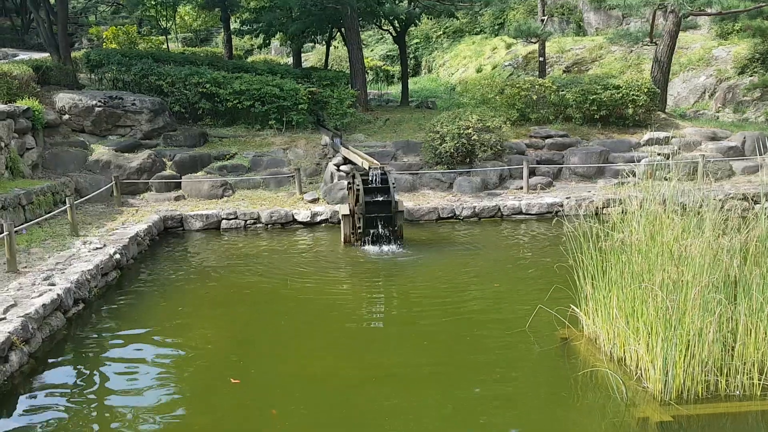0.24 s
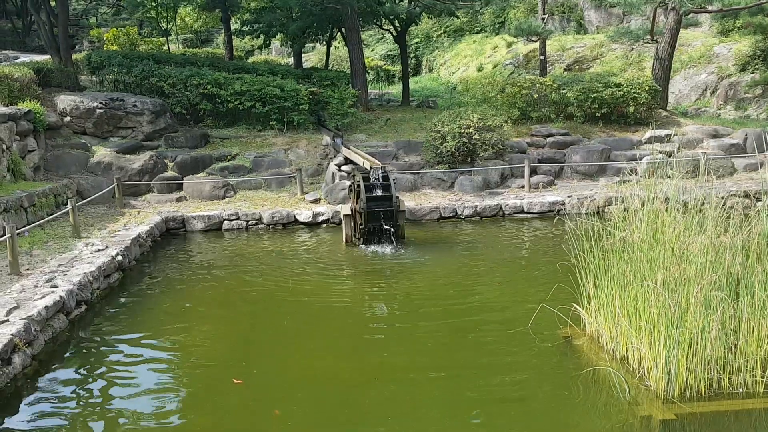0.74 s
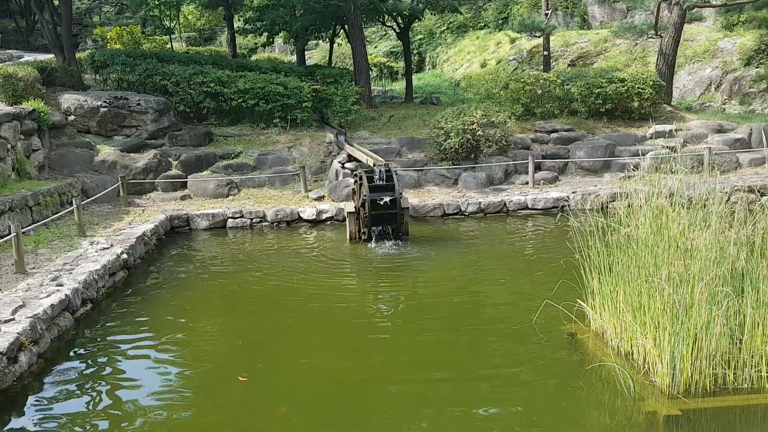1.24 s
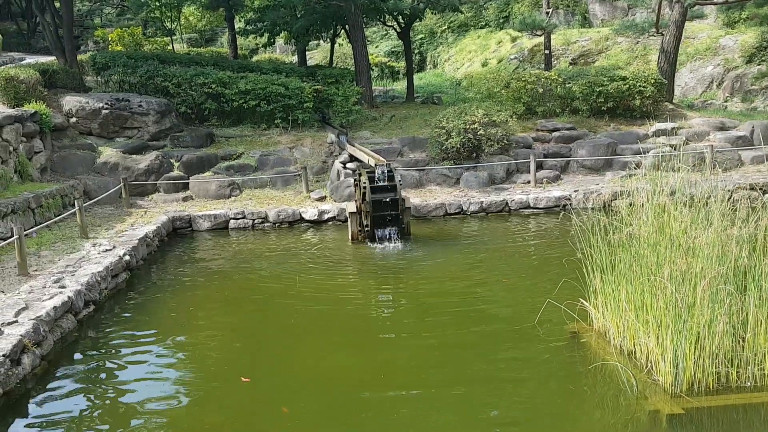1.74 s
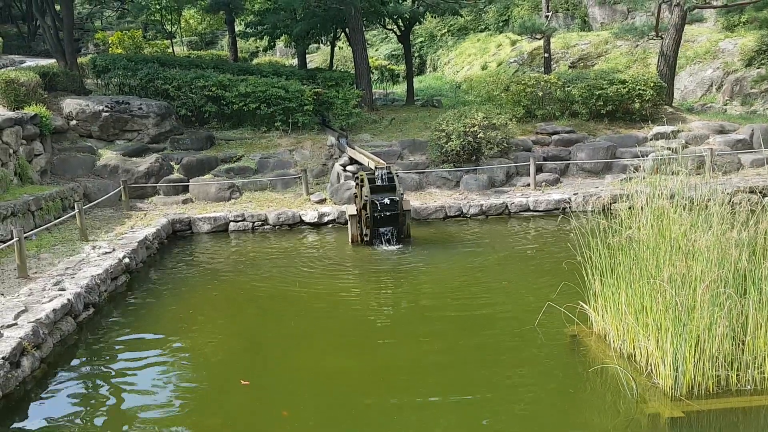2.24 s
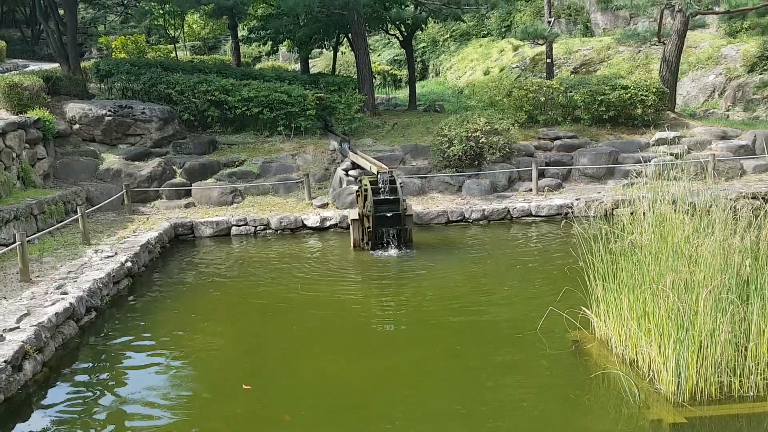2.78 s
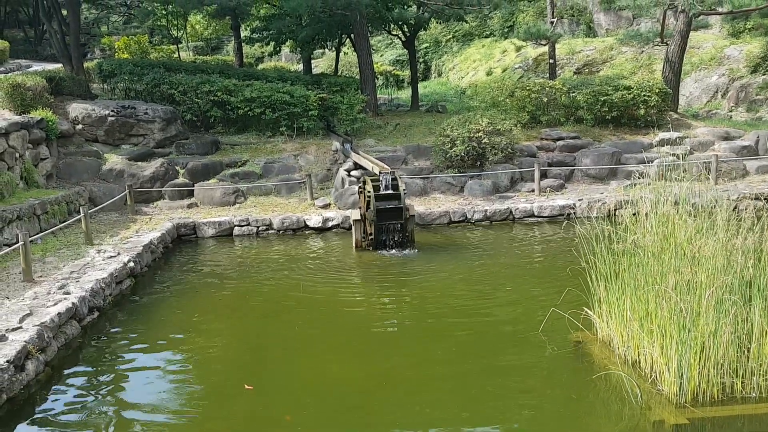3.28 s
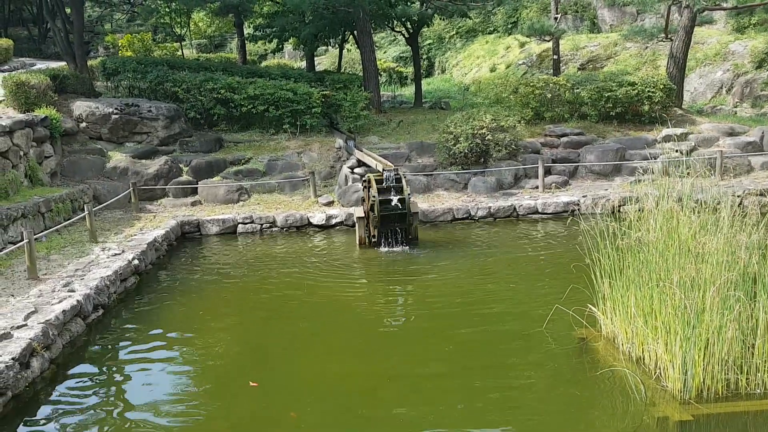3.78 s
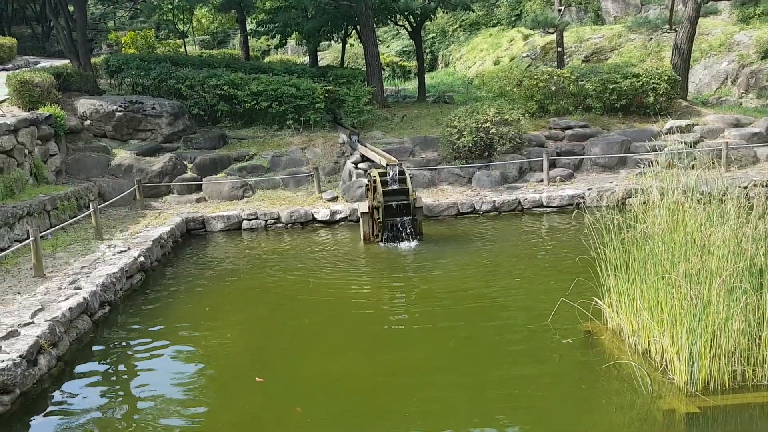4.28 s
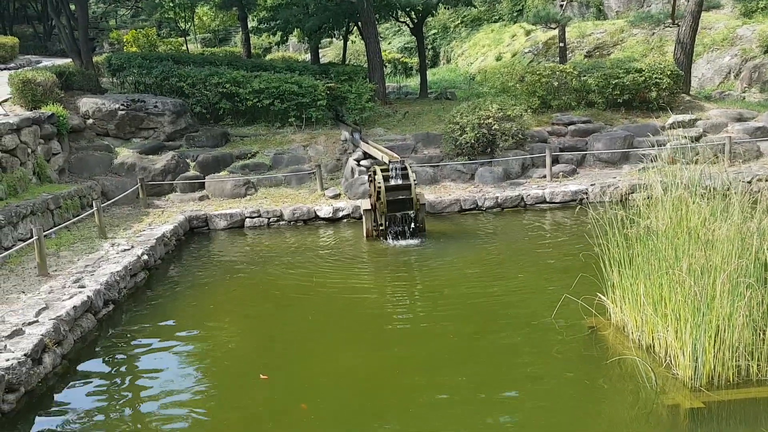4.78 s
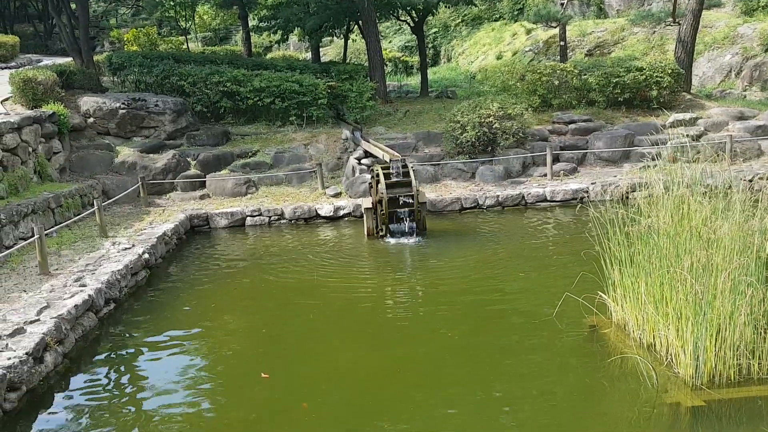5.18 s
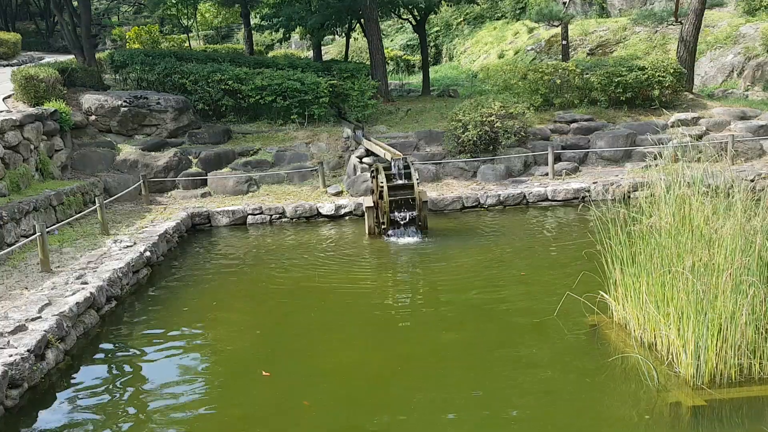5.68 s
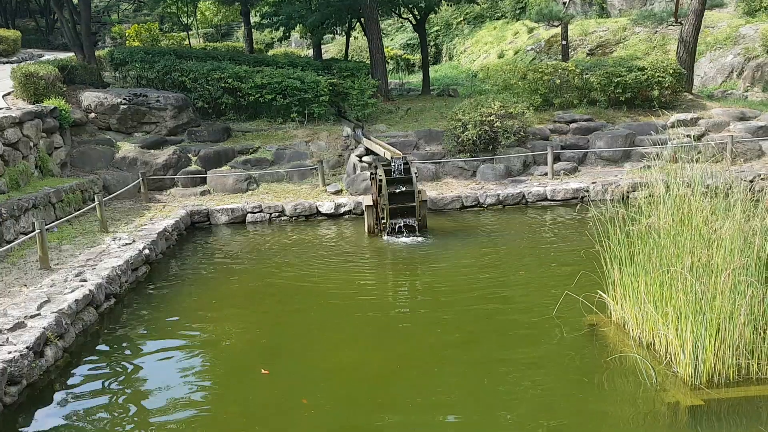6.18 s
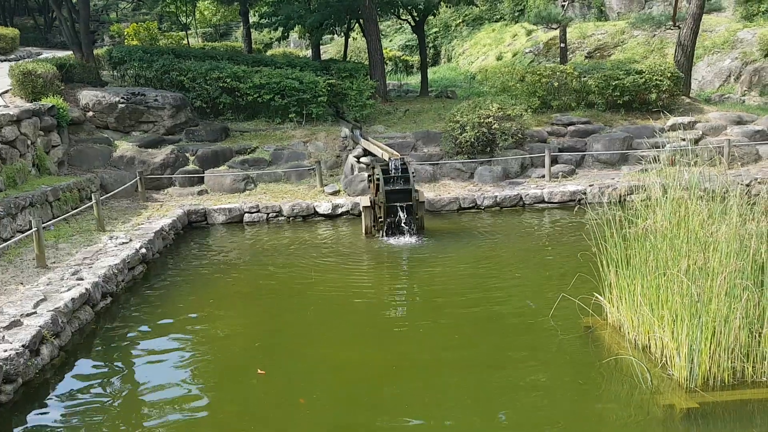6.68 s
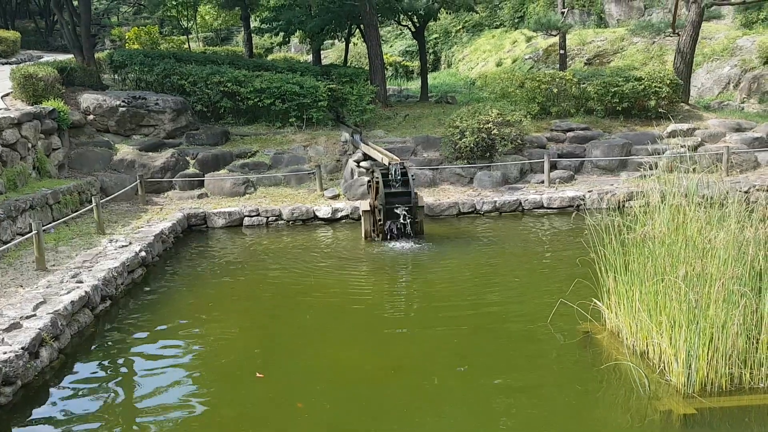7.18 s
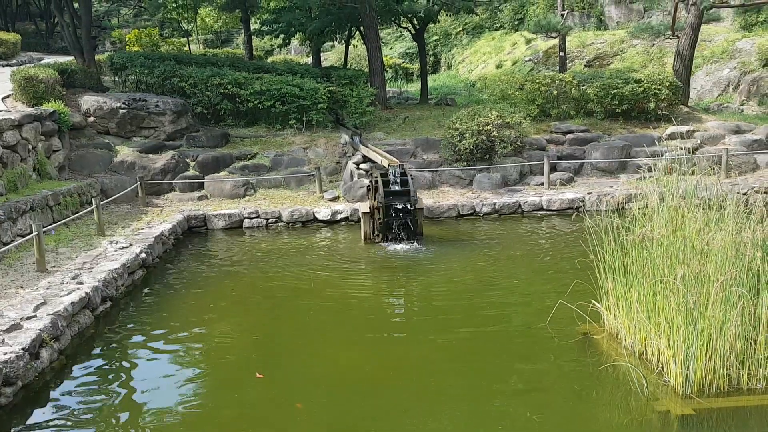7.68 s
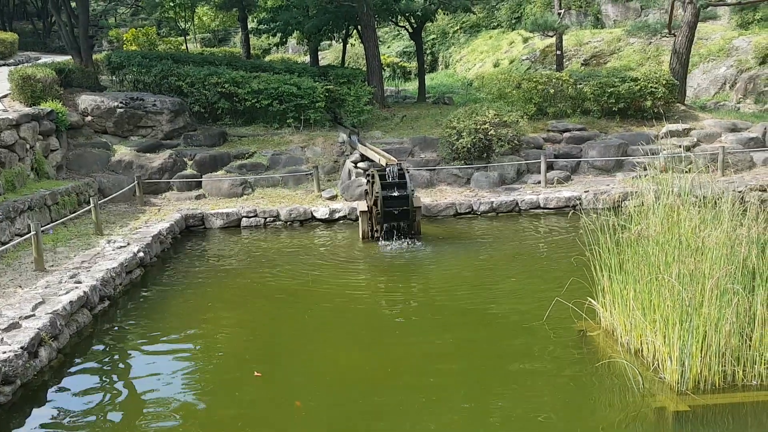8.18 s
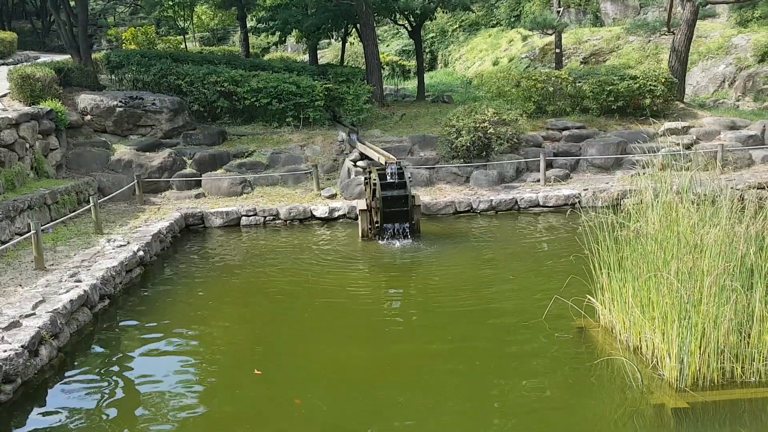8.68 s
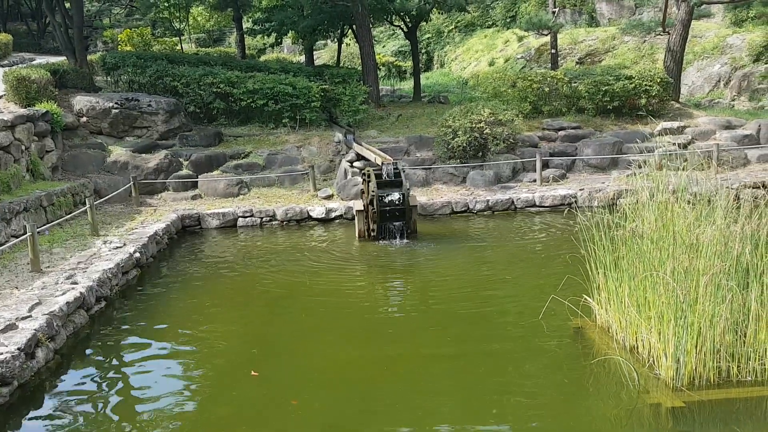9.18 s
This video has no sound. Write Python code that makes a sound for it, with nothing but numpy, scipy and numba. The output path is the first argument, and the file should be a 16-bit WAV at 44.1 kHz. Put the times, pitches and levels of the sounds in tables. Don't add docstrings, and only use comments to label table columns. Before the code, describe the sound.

A garden pond waterwheel thuds softly and pours splashing water as a rasping cicada chorus climbs to full strength and holds.

```python
import sys
import numpy as np
from scipy import signal
from scipy.fft import rfft, irfft, next_fast_len
from scipy.io import wavfile
from scipy.ndimage import uniform_filter1d
from numba import njit

SR = 44100
rng = np.random.default_rng(int(sys.argv[2]) if len(sys.argv) > 2 else 0)


def voltage_ratio(decibels):
    exponent = np.asarray(decibels, float) / 20
    return 10 ** exponent


def unload_wav(signal):
    wavfile.write(
        sys.argv[1],
        SR,
        np.round(np.clip(np.atleast_2d(signal).T, -1, 1) * 32767).astype(np.int16),
    )


N = 416304
TIME = np.arange(N) / SR
SIZE = next_fast_len(N)
HZ = np.arange(SIZE // 2 + 1) * SR / SIZE


def level(x, db):
    return x * voltage_ratio(db) / np.sqrt(np.mean(x ** 2))


def curve(table, axis=1):
    table = np.array(table, float)
    return np.interp(TIME, table[:, 0], table[:, axis])


def over_hz(table, axis=1):
    table = np.array(table, float)
    return np.interp(np.log(HZ + 1), np.log(table[:, 0]), table[:, axis])


def shape(x, gain):
    return irfft(rfft(x, SIZE) * gain, SIZE)[..., :N]


def walk(rate):
    hold = int(SR / rate)
    steps = np.repeat(rng.standard_normal(N // hold + 1), hold)
    return 1.3 * uniform_filter1d(uniform_filter1d(steps, hold), hold)[:N]


def low_pass(hz, order):
    return 1 / (1 + (HZ / hz) ** order)


def resonance(hz, width):
    return 1 / (1 + ((HZ - hz) / width) ** 2)


@njit
def grains(start, hz, ring, size, glide, rise, n):
    out = np.zeros(n)
    for k in range(len(start)):
        length, first, turn = int(ring[k] * SR), int(start[k] * SR), 0.
        for i in range(max(0, -first), min(length, n - first)):
            turn += 2 * np.pi * hz[k] * (1 + glide * i / length) / SR
            fade = 1000. ** (-i / length)
            push = 1 - np.exp(-i / (rise * SR))
            out[first + i] += size[k] * np.sin(turn) * fade * push
    return out


# frequency in Hz, likeness from 0 to 1.
PORT_LIKENESS = [(40, 0.96), (130, 0.95), (290, 0.78), (640, 0.57), (1000, 0.26), (1400, 0), (2400, 0.52)]
# frequency in Hz, left minus right in dB.
PORT_TILT = [(100, 0), (400, -1.5), (1300, -2.5), (2500, -3)]


def spread(a, b):
    alike = np.clip(over_hz(PORT_LIKENESS), 0, .99)
    mid = shape(a, np.sqrt(1 + alike))
    side = shape(b, np.sqrt(1 - alike))
    pair = np.array([mid + side, mid - side]) / 2
    return shape(pair, voltage_ratio(np.outer([.5, -.5], over_hz(PORT_TILT))))


def singer(pulls, click, fade, wobble):
    ribs = 6
    phase = rng.random() + np.cumsum(pulls * (1 + wobble * walk(30))) / SR
    buckle = ribs * phase
    strength = voltage_ratio(0.83 * rng.standard_normal(N // 100))[buckle.astype(int)]
    burst = np.exp(-(buckle % 1) / click - (phase % 1) / fade)
    return strength * burst * rng.standard_normal(N)


# frequency in Hz, width in Hz, height in dB.
BELLY_RINGS = [(3620, 130, 2), (4560, 100, 1), (4740, 55, 1), (5960, 370, 1), (3820, 140, 2),
               (4450, 39, 3.5), (3230, 40, 1.5), (7360, 130, 1.5)]
# frequency in Hz, share from 0 to 1.
DIRECT_SHARE = [(2900, .35), (3450, .6), (4000, .4), (4600, .3), (6000, .15), (7500, .32), (8500, .12),
                (9700, .36), (12000, .3), (14000, .25)]


def chorus(pulls, colour, lead_db, haze_db, click, fade, ringing, count):
    port_lag_s = .000183
    haze = voltage_ratio(0.25 * walk(8)) * rng.standard_normal((3, N))
    lead = level(singer(pulls, click, fade, .006), lead_db)
    lead = level(lead + haze[2], 0)
    pair = np.array([shape(lead, np.exp(-2j * np.pi * HZ * port_lag_s)), lead])

    others = np.array([sum(singer(pulls * rng.uniform(0.99, 1.03), click, fade, .012) for _ in range(count))
                       for _ in range(2)])
    around = level(level(others, haze_db) + haze[:2], 0)

    steep = np.minimum(HZ / colour[0][0], 1) ** 8
    rings = sum(db * resonance(hz, width) for hz, width, db in BELLY_RINGS)
    ports = np.array([over_hz(colour, axis=1), over_hz(colour, axis=2)])
    gain = steep * voltage_ratio(ringing * rings + ports)
    direct = over_hz(DIRECT_SHARE)
    return level(shape(pair, gain * np.sqrt(direct)) + shape(around, gain * np.sqrt(1 - direct)), 0)


# time in seconds, level in dB, lean to the deep belly notes in dB.
NEAR_SONG = [
    (0, -45, -6),
    (.5, -40, 0),
    (1.1, -38, 3.5),
    (2, -33.5, 4.5),
    (2.6, -32, 4.5),
    (3.6, -29.5, 3),
    (4.5, -28, 1),
    (5.2, -27, 0),
    (7, -27, 0.8),
    (9.44, -27.5, 1),
]
# frequency in Hz, left in dB, right in dB.
NEAR_COLOUR = [(2860, -22.5, -22), (3490, -3, 1.5), (3970, -10, -6.5), (4530, -1, 2.5), (5300, -7.5, 0.5),
               (5970, -3.5, 5), (6500, -9, 4), (7560, -11, 1), (8330, -12, -10), (9640, -6, -12),
               (11040, -10.5, -16), (12550, -13.5, -15), (13900, -24, -20.5), (15500, -32, -31)]
# frequency in Hz, left in dB, right in dB.
FAR_COLOUR = [(2930, -23, -11.5), (3410, -8, -6), (4020, -16.5, -2.5), (4430, -6.5, -3.5), (5200, -13.5, 1),
              (6200, -5.5, -1.5), (6600, -52, -5.5), (7480, -5.5, -4), (8770, -32, -16.5),
              (9500, -16.5, -20), (11100, -18.5, -32), (12600, -24, -18), (13800, -25, -27),
              (15500, -37, -32)]


def cicadas():
    pulls = 50 * (1 + .04 * walk(2))
    far_db, shrill_db = -33, .5
    near = chorus(pulls, NEAR_COLOUR, lead_db=1.5, haze_db=-5, click=.45, fade=.8, ringing=1, count=2)
    far = chorus(pulls, FAR_COLOUR, lead_db=2, haze_db=-5, click=.5, fade=.6, ringing=.4, count=2)
    deep = shape(near, low_pass(5000, 12))
    shrill = shape(near, 1 - low_pass(8400, 12))
    near = near + (voltage_ratio(curve(NEAR_SONG, axis=2)) - 1) * deep + (voltage_ratio(shrill_db) - 1) * shrill
    return near * voltage_ratio(curve(NEAR_SONG) + 2.5) + far * voltage_ratio(far_db + 3)


# start in seconds, peak in dB, plank pitch in Hz, frame against plank in dB.
WHEEL_KNOCKS = [(0.014, -38.5, 243, -16), (0.251, -33, 167, -4), (0.289, -41, 260, -24),
                (0.529, -40, 161, 2), (0.569, -33.5, 198, -15), (0.854, -24.5, 200, -14),
                (0.89, -37.5, 231, -3), (0.907, -34.5, 187, -7), (1.191, -38, 169, 2.5),
                (1.639, -37, 210, 4), (1.682, -43, 223, -2), (1.797, -44, 151, -2), (4.513, -41, 208, -7),
                (5.011, -34.5, 210, -27), (5.488, -39, 227, -3), (5.521, -41, 205, -15),
                (5.872, -36, 222, -25), (5.901, -37.5, 213, -17), (6.198, -24, 217, -15),
                (6.22, -37, 238, -16), (6.474, -38, 254, -26), (6.499, -38, 229.3, -18),
                (6.716, -37, 229, -10), (6.994, -37.5, 192, -29), (7.31, -44.5, 275, -20),
                (7.536, -33, 198, -4), (7.866, -26.5, 211.7, -13.5), (7.908, -40, 262, -4),
                (8.194, -37, 183, -3), (8.653, -30.5, 197, -8)]
# middle in seconds, length in seconds, level in dB.
AXLE_SQUEALS = [
    (1.6, .5, -66),
    (5.75, 0.65, -63),
    (6.332, .6, -49),
    (7.6, 1, -58),
]


def wheel():
    s, db, hz, frame_db = np.array(WHEEL_KNOCKS, float).T
    one = np.ones(len(s))
    frame_hz, axle_hz, axle_db = 106, 348, -63
    hum_db, hum_after_knock_db, hum_swell_s = -59, -15.5, 0.16

    harder_db = db + 38
    ring = np.clip(.07 - .0013 * harder_db, .01, .4)
    crack_db = db - 10 - .3 * harder_db
    planks = grains(s + .001, hz * 1.05, ring, voltage_ratio(db + 11), -.12, .006, N)
    thud = grains(s + .001, hz * 1.07, .03 * one, voltage_ratio(db + 22), -.08, .016, N)
    crack = grains(s + 0.00414, hz * 2.72, 0.27 * ring, voltage_ratio(crack_db + 6), -.1, 0.00088, N)
    frame = grains(s, frame_hz * one, .15 * one, voltage_ratio(db + frame_db + 12.5), 0., 0.008, N)

    coarse = TIME[::64]
    since = np.maximum(coarse - s[:, None], 0) / hum_swell_s
    swell = voltage_ratio(hum_db) + voltage_ratio(db + frame_db + hum_after_knock_db) @ (since * np.exp(1 - since))
    hum = shape(rng.standard_normal(N), resonance(frame_hz, 4))
    hum = level(hum, -3) * np.interp(TIME, coarse, swell)

    rub = voltage_ratio(axle_db) + sum(voltage_ratio(top_db) * np.exp(-(4 * (TIME - middle) / length) ** 2 / 2)
                             for middle, length, top_db in AXLE_SQUEALS)
    squeal = shape(rng.standard_normal(N), resonance(axle_hz, 2.9))
    squeal = level(squeal, -5) * rub
    return (planks + thud + crack + frame + hum + squeal) * voltage_ratio(np.array([[-.3], [.3]]))


# frequency in Hz, density in dB per Hz.
WATER_COLOUR = [(250, -23.5), (400, -6), (660, -12), (900, -13), (1230, -14.5), (1700, -14.5),
                (2500, -14.5), (4000, -30), (9000, -50)]
# time in seconds, first cancelled frequency in Hz.
POND_MIRROR = [
    (0, 400),
    (5.5, 411),
    (7, 427),
    (9.44, 485),
]


def fizz(count):
    at, pitch, big = rng.random((count, 3)).T
    hz = 600 * 7 ** pitch
    size = voltage_ratio(4.5 * big ** 3) * (hz / 1000) ** 0.96
    bubbles = grains(at * N / SR, hz, 14 / hz, size, 0.33, 0.00079, N)
    hiss = voltage_ratio(.6 * walk(5)) * rng.standard_normal(N)
    pour = shape(level(bubbles, -10) + hiss, voltage_ratio(over_hz(WATER_COLOUR)))
    dull = shape(pour, low_pass(1800, 2))
    mirrored = np.interp(TIME - 1 / curve(POND_MIRROR), TIME, dull)
    return pour - 0.43 * mirrored


# start in seconds, peak in dB, bubble pitch in Hz.
BIG_PLOPS = [(1.099, -26, 920), (1.119, -29, 480), (1.601, -31, 912), (1.92, -32, 611), (2.223, -40, 448),
             (2.311, -26, 965), (3.128, -26, 960), (3.212, -34, 970), (3.715, -30, 960), (4.214, -20, 1220),
             (4.474, -27, 590), (4.53, -15.5, 1070), (4.573, -26, 640), (4.835, -35, 657),
             (5.105, -25, 651), (5.394, -22.5, 1030), (5.483, -33, 720), (5.804, -36, 625),
             (5.966, -26, 686), (6.706, -24, 990), (6.947, -27, 720), (7.752, -31, 679), (8.137, -29, 589),
             (8.826, -35, 614), (8.866, -21, 1360), (8.867, -24, 751), (8.951, -25, 576)]
# time in seconds, level in dB.
POUR_LEVEL = [
    (0, -44.5),
    (3.9, -45.5),
    (4.6, -44.5),
    (6.8, -43.5),
    (7.3, -45),
    (9.44, -44.7),
]


def water():
    s, db, hz = np.array(BIG_PLOPS, float).T
    plops = grains(s, hz * 0.944, 25.4 / hz, voltage_ratio(db - 3.5), .12, 0.0021, N)
    plops = plops * voltage_ratio(-2.1 * np.array([[.5], [-.5]]))
    pour = level(spread(fizz(count=9000), fizz(count=9000)), 1.15)
    return pour * voltage_ratio(curve(POUR_LEVEL) + .5 * walk(4)) + plops


# start in seconds, peak in dB, bubble pitch in Hz.
SMALL_SPLASHES = [(0.705, -36, 1600), (1.297, -41, 1830), (3.014, -33, 1350), (3.907, -34, 2200),
                  (4.1515, -30, 2330), (4.2086, -32, 1900), (4.382, -36, 1820), (4.51, -32, 2227),
                  (6.2194, -40, 2360), (6.3644, -36, 1770), (6.586, -33, 2490), (6.842, -32, 2190),
                  (7.334, -41, 1380), (7.5847, -39, 1690), (8.918, -31.5, 2540), (9.2189, -36, 1983)]


def splashes():
    s, db, hz = np.array(SMALL_SPLASHES, float).T
    since = TIME[:4000]
    spray_shape = np.exp(-since / 0.0079) * (1 - np.exp(-since / 0.0014))
    burst = np.zeros(N + len(since))
    for first, size in zip((s * SR).astype(int), voltage_ratio(db - 3)):
        burst[first:first + len(since)] += size * spray_shape
    rise = (HZ / 1000) ** 4
    band = rise / (1 + rise) * low_pass(3000, 4)
    spray = shape(burst[:N] * rng.standard_normal((2, N)), band) * voltage_ratio(14.5)
    bubble = grains(s, hz * .96, 30 / hz, voltage_ratio(db + 3.5), 0.087, 0.0015, N)
    return (spray + bubble) * voltage_ratio(np.array([[-1.4], [1.4]]))


# frequency in Hz, density in dB per Hz.
TOWN_COLOUR = [(15, -25), (30, -8), (45, 0), (92, -4), (140, -6), (224, -7), (300, -10), (400, -25),
               (700, -42)]
# time in seconds, level in dB.
RUMBLE_LEVEL = [
    (0, -47),
    (2, -49),
    (4.2, -48.5),
    (5.1, -46),
    (8, -45.5),
    (9.44, -47.5),
]


def town():
    a, b = (shape(rng.standard_normal(N), voltage_ratio(over_hz(TOWN_COLOUR))) for _ in range(2))
    rumble = spread(a, b)
    deep = shape(rumble, low_pass(100, 4))
    upper = level(rumble - deep, 0.65)
    swell_db = curve(RUMBLE_LEVEL)
    deep_db = -49 - 1.1 * (swell_db - swell_db.mean()) + 1.5 * walk(4.92)
    return level(deep, 0) * voltage_ratio(deep_db) + upper * voltage_ratio(swell_db + 0.66 * walk(6))


def scene():
    return cicadas() + wheel() + water() + splashes() + town()


def band_limit(x):
    return signal.sosfilt(signal.butter(12, 15740, fs=SR, output="sos"), x)


def record(dry):
    return band_limit(dry)


dry = scene()
out = record(dry)
unload_wav(out)
```